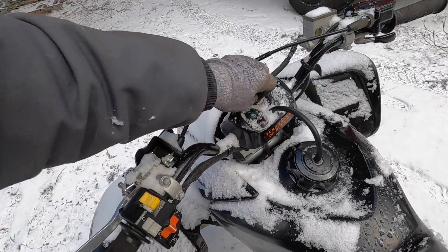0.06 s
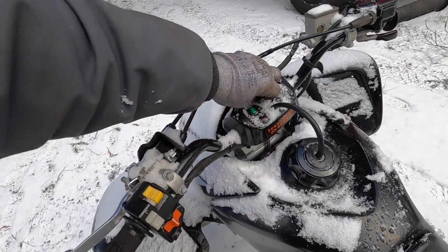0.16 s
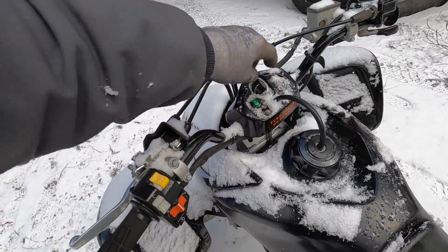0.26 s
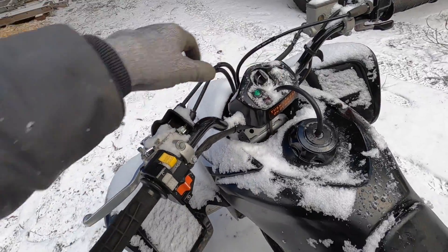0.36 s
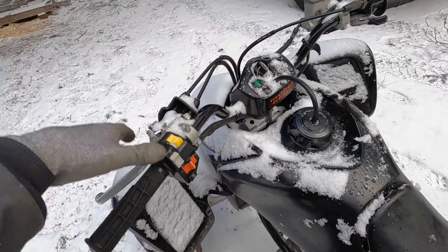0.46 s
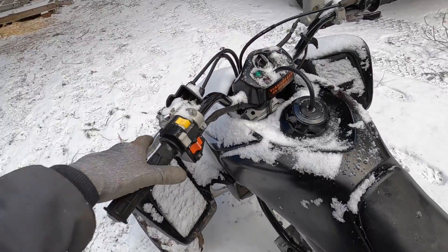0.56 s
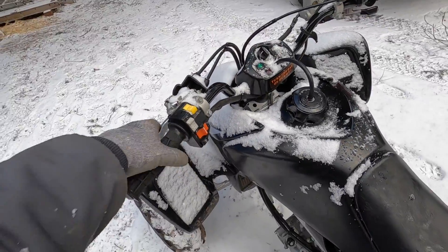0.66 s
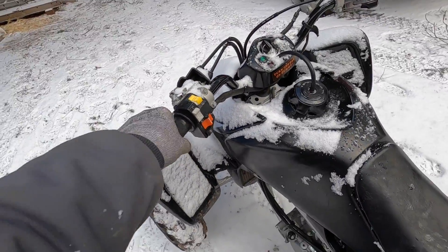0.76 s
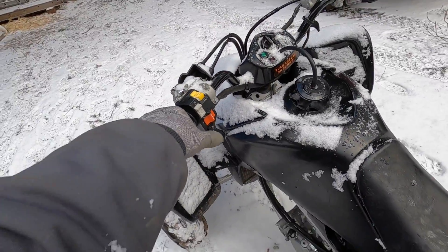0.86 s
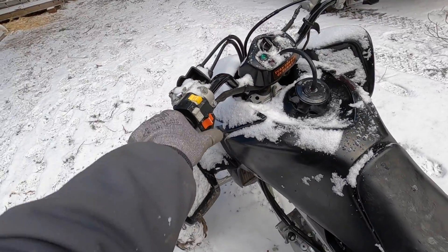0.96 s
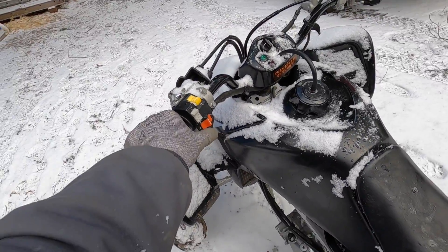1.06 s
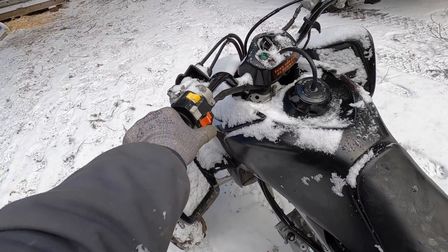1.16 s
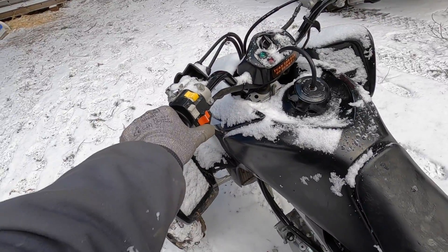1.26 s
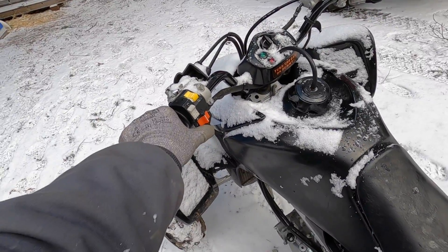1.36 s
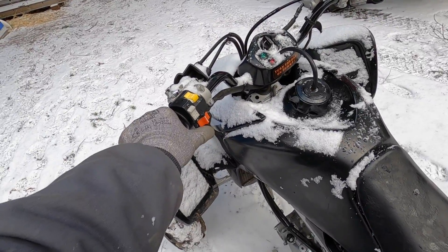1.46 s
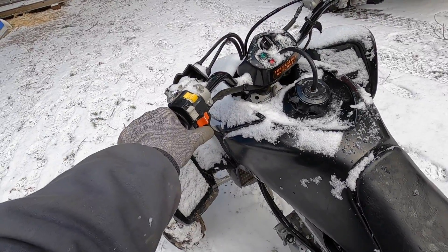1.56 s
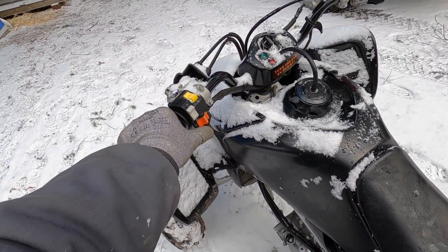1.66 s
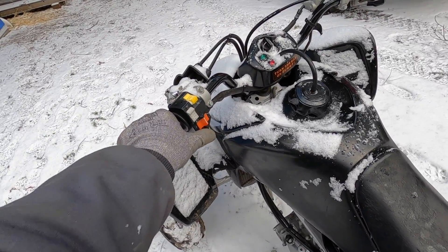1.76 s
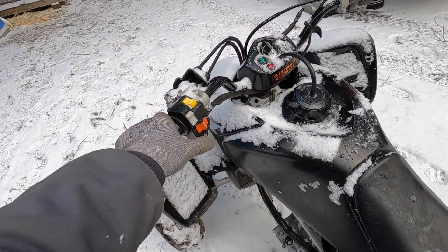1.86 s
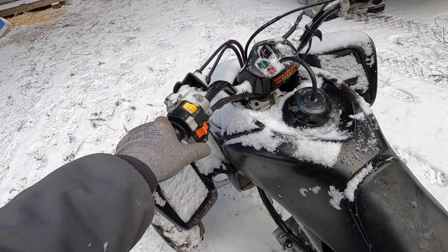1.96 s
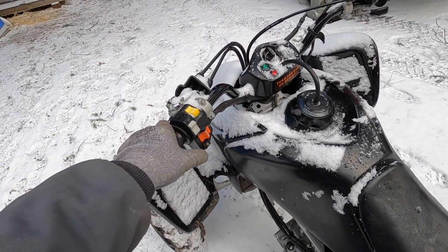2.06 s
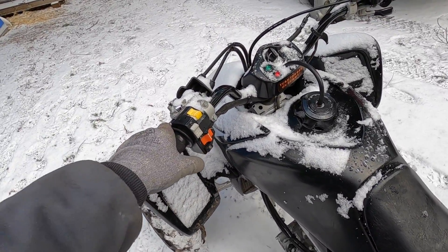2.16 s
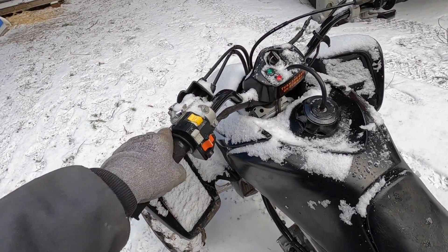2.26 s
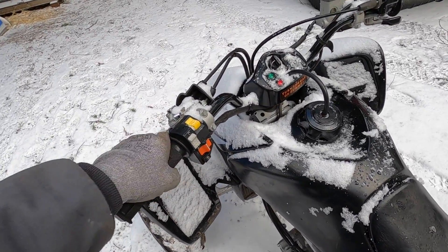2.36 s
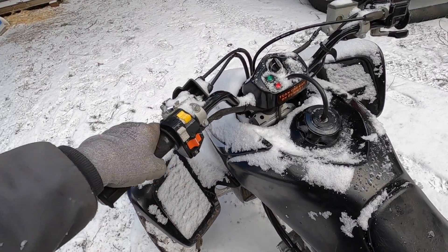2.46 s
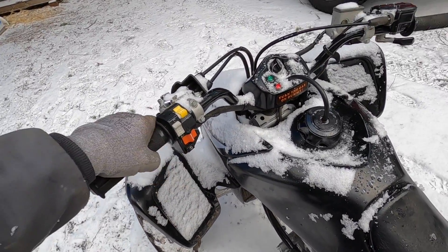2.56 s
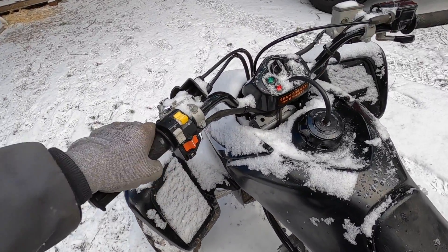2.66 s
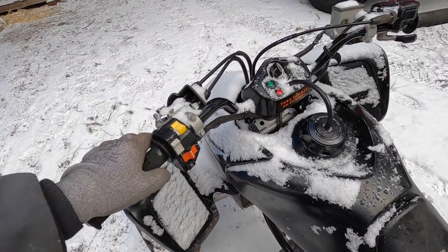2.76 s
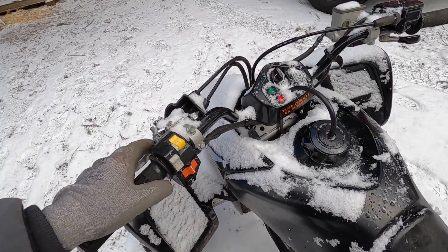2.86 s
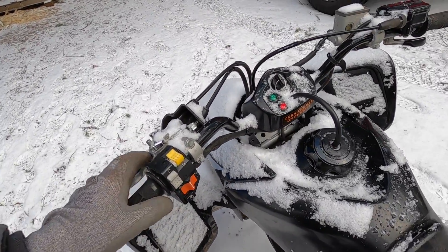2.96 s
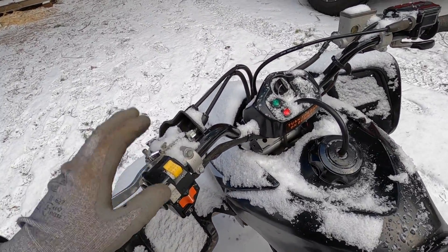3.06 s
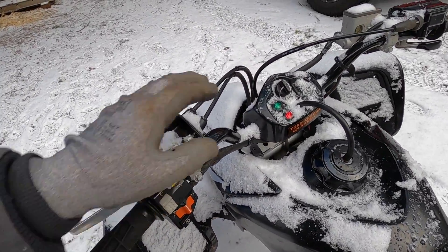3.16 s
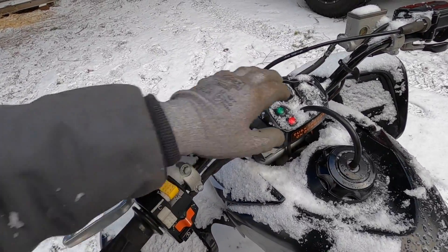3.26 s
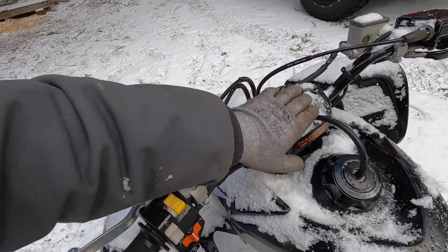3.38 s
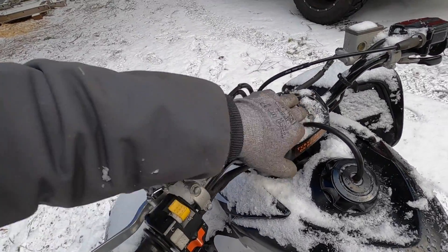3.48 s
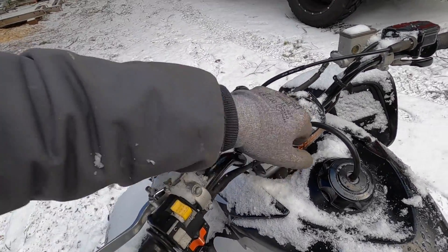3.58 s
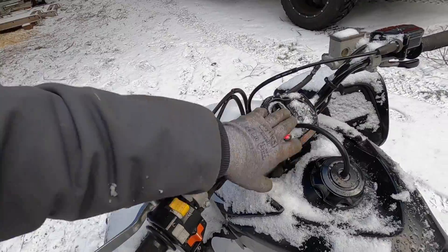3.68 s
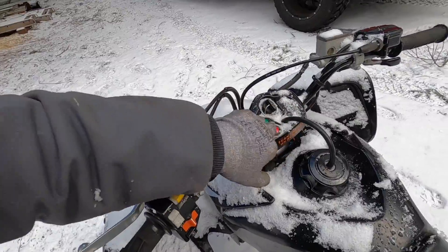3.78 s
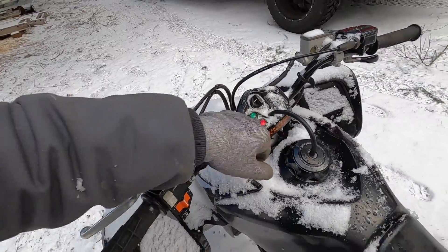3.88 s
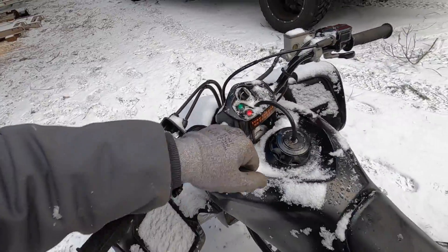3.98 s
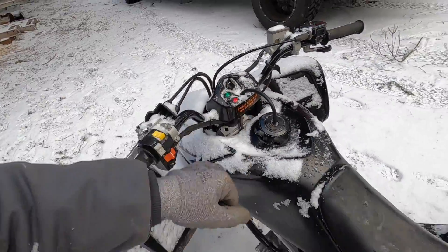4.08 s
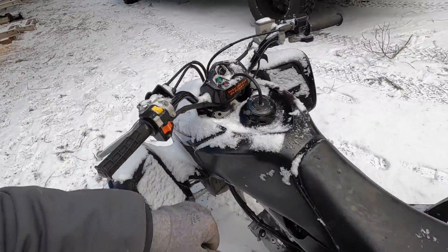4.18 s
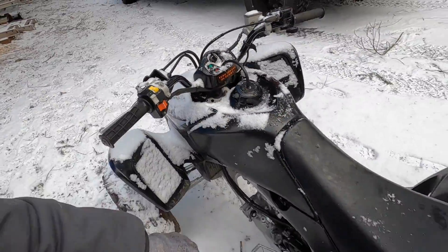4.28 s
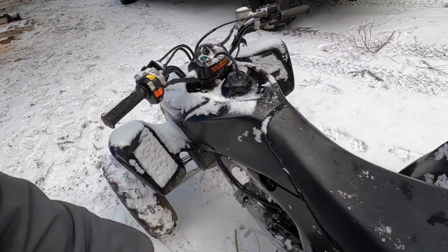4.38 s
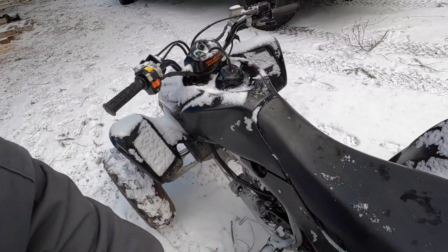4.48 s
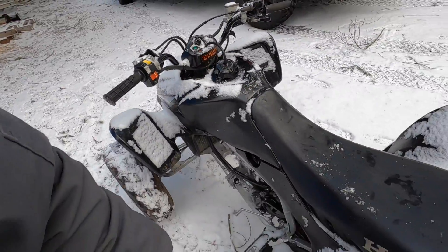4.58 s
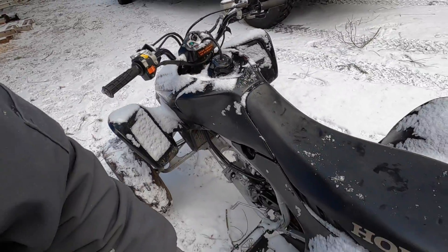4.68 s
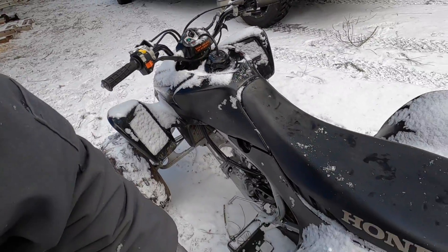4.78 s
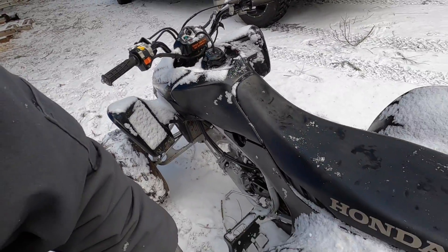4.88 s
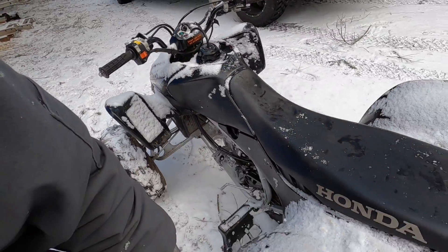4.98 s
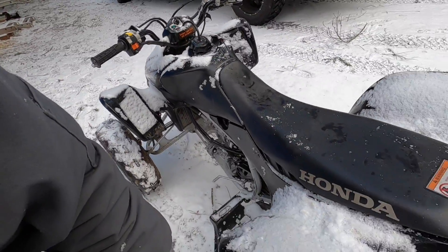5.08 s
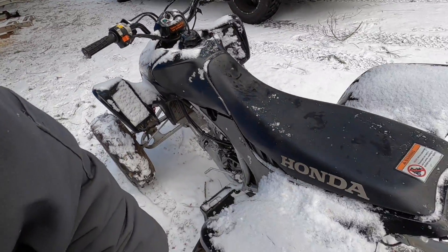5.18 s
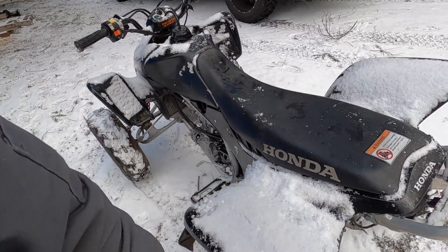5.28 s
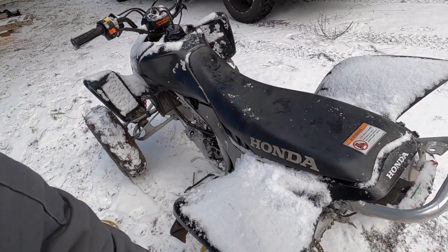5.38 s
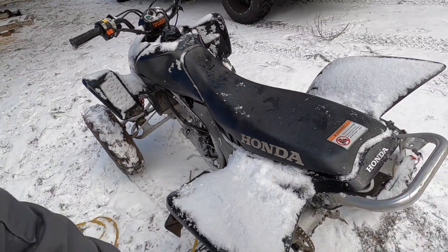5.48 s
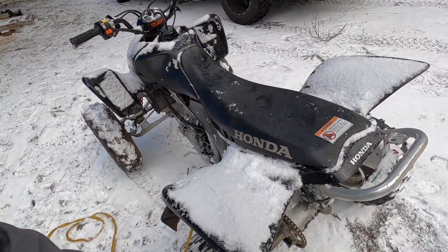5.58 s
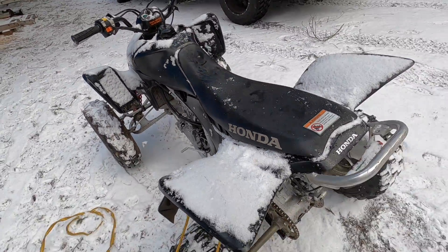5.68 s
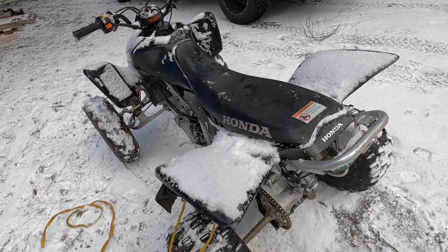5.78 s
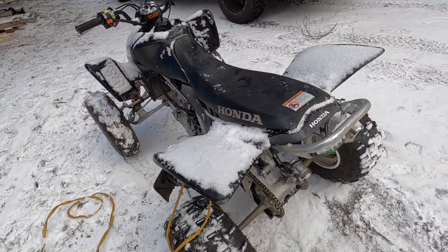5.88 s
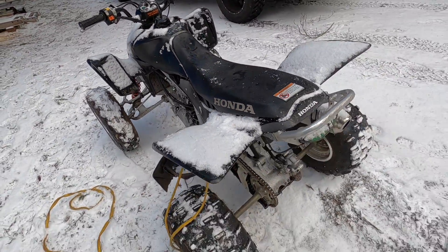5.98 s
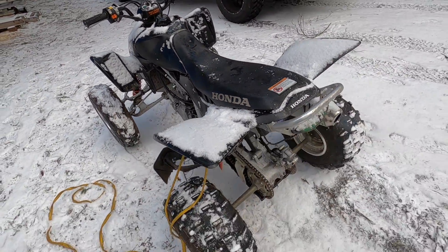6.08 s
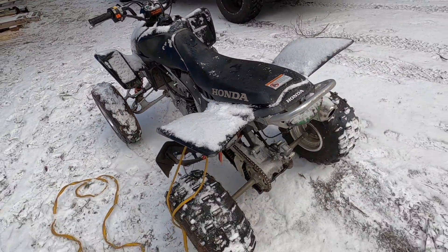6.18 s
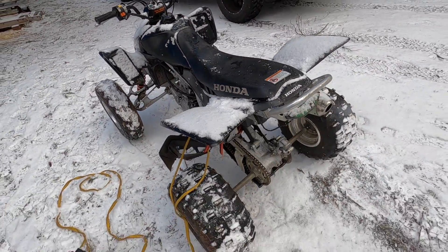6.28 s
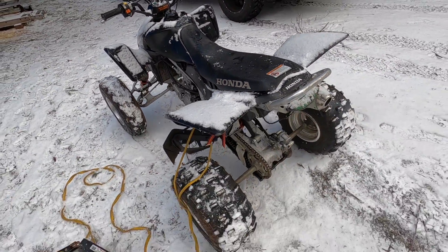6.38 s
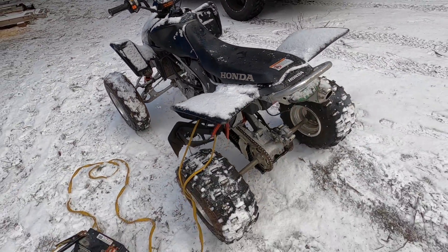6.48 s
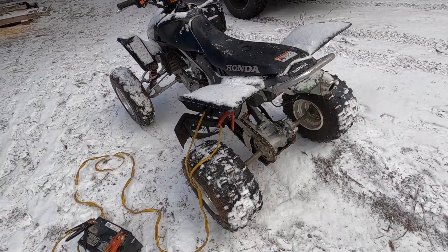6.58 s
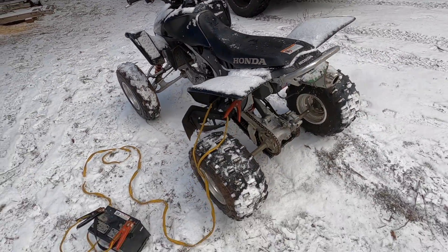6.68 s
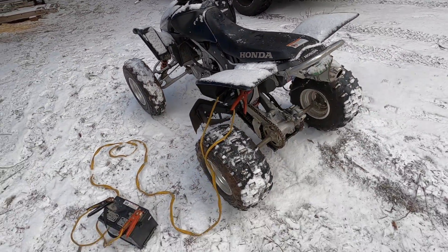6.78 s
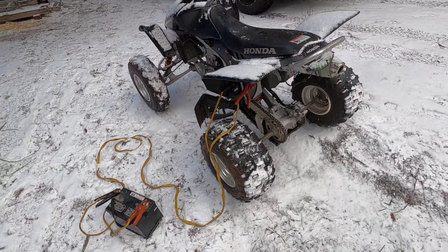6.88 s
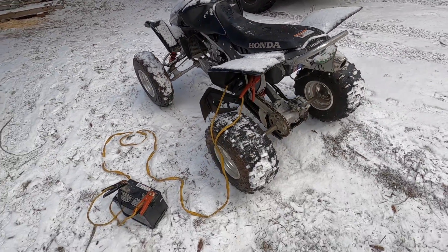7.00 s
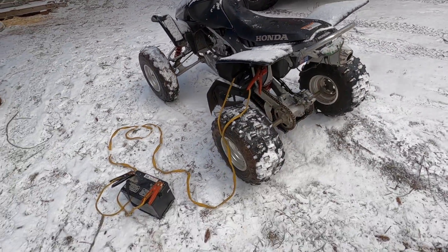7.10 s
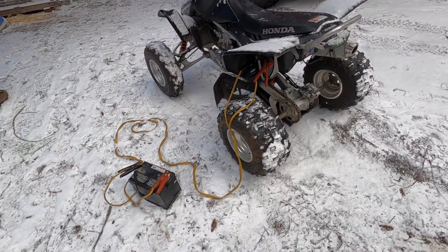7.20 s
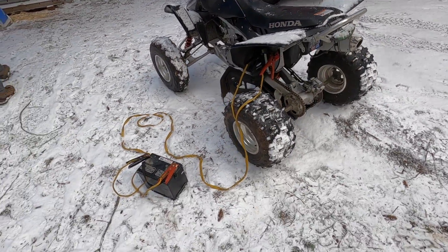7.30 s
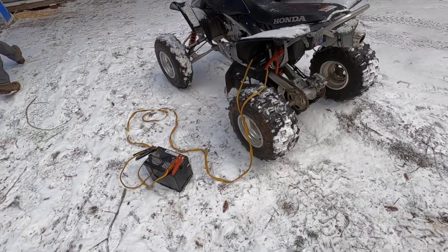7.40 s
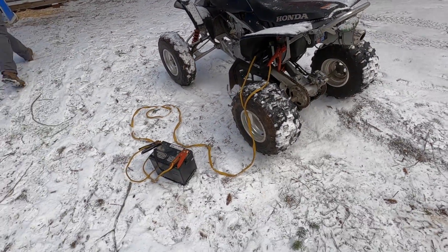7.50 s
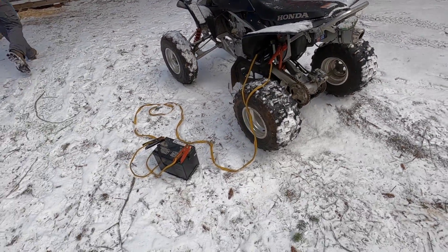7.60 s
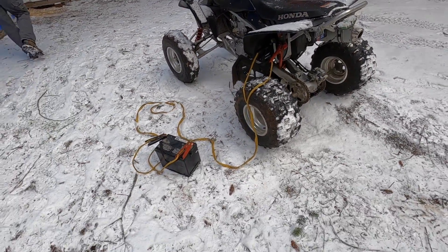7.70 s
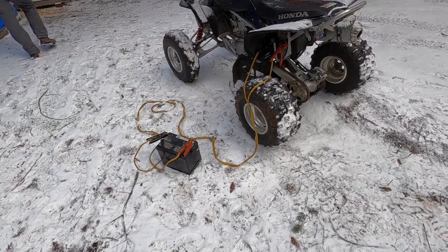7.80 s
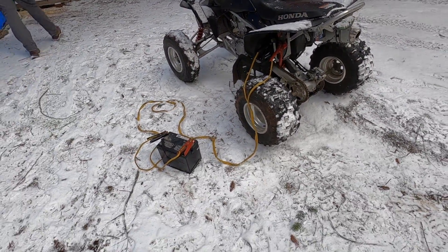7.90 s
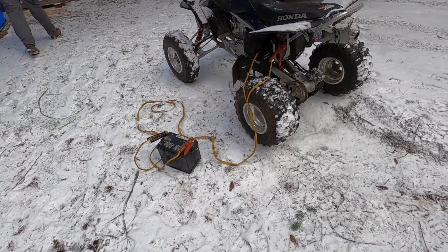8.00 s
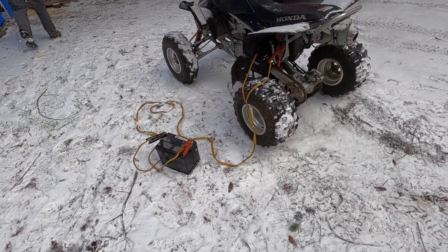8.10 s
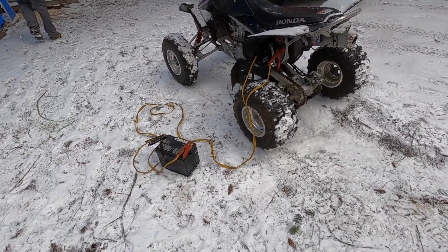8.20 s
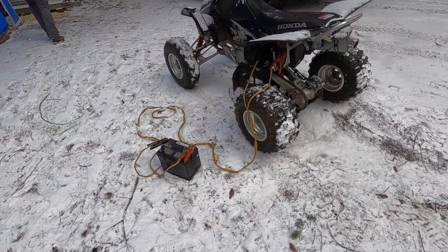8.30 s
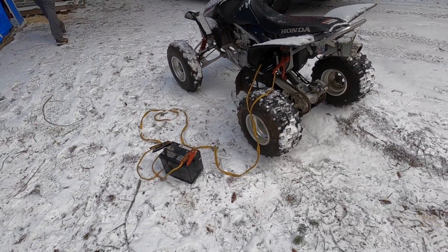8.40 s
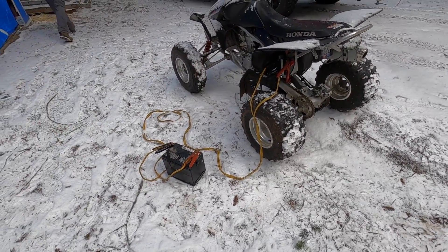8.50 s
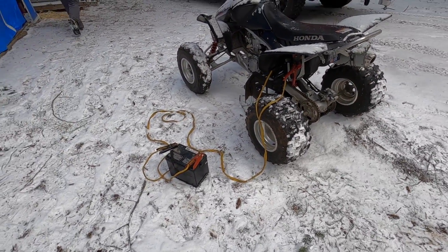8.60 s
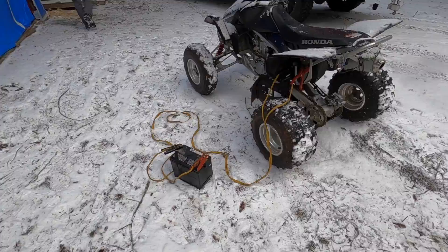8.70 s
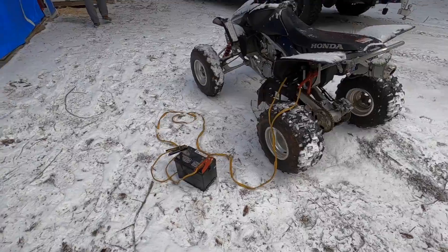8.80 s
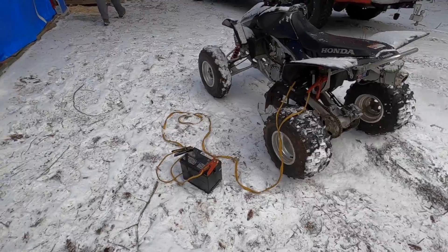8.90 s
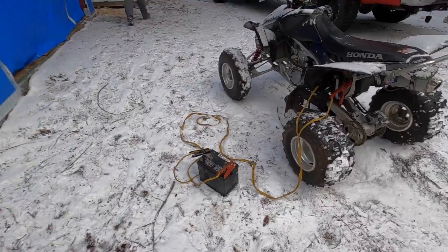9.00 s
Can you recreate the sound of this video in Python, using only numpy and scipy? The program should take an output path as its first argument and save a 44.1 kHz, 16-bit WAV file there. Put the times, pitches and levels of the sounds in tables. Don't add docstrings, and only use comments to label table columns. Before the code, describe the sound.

In a snowy yard with low distant traffic rumble, a gloved hand snaps a key and lever. The starter briefly whirs and grinds its teeth, the one-cylinder quad engine coughs unevenly, catches, speeds up and runs steadily. The close microphone walks with the listener from handlebar past the seat to the tailpipe, so deep muffled thumping turns into sharper, raspier exhaust popping.

```python
import sys
import numpy as np
from scipy import signal
from scipy.fft import rfft, irfft, next_fast_len
from scipy.io import wavfile
from scipy.ndimage import uniform_filter1d

SR = 44100
rng = np.random.default_rng(int(sys.argv[2]) if len(sys.argv) > 2 else 0)


def invert_db(x):
    u = np.asarray(x, float) / 20
    return 10 ** u


def log_audio(samples):
    frames = np.atleast_2d(samples).T
    limited = np.clip(frames, -1, 1)
    pcm = np.round(limited * 32767).astype(np.int16)
    wavfile.write(sys.argv[1], SR, pcm)


N = 399105

# (time [s], silencer level [dB], whole pipe level [dB])
COUGHS = [(1.32, -11.5, -5), (1.344, -13.5, -5), (1.366, -29, -9.5), (1.403, -2, 1), (1.4167, -0.5, 3.5),
          (1.43, -13.5, -7.5), (1.497, -13, -6.5), (1.54, -17.5, -12.5), (1.563, -2.5, -3.5),
          (1.574, -12, 0), (1.644, -9, -7), (1.659, -0.5, 2), (1.673, -4, -3)]
# (time [s], firing rate [1/s])
SPEED = [(1.7262, 15.582), (2.01, 18.854), (2.91, 23.047), (2.99, 22.84), (3.63, 24.299), (4.17, 23.756),
         (4.25, 24.703), (4.89, 25.52), (5.39, 25.037), (5.47, 25.26), (6.25, 26.064), (6.41, 25.791),
         (7.05, 26.379), (7.15, 25.71), (7.35, 26.457), (8.03, 26.339), (8.81, 27.443), (9.06, 27.312)]
CATCH_S = SPEED[0][0]


def in_time(rows, t=None):
    s, *columns = np.transpose(rows)
    if t is None:
        t = np.arange(N) / SR
    return [np.interp(t, s, column) for column in columns]


def coloured(x, spectrum):
    size = next_fast_len(N)
    hz, db = np.transpose(spectrum)
    bins_hz = np.arange(size // 2 + 1) * SR / size
    shape = np.interp(np.log(bins_hz + 1), np.log(hz), db)
    return irfft(rfft(x, size) * invert_db(shape), size)[..., :N]


def noise(spectrum):
    x = coloured(rng.standard_normal(N), spectrum)
    return x / np.std(x)


def butter(x, order, hz, kind="low"):
    return signal.sosfilt(signal.butter(order, hz, kind, fs=SR, output="sos"), x)


def resonance(x, hz, width_hz):
    r = np.exp(-np.pi * width_hz / SR)
    feedback = [1, -2 * r * np.cos(2 * np.pi * hz / SR), r * r]
    return signal.lfilter([(1 - r * r) / 2, 0, (r * r - 1) / 2], feedback, x)


def swell(u, rise, t60):
    u = np.maximum(u, 0)
    return (1 - np.exp(-u / rise)) * invert_db(-60 * u / t60)


def ring(u, hz, rise, t60):
    return np.sin(2 * np.pi * hz * u) * swell(u, rise, t60)


def lay(shapes, starts):
    out = np.zeros(N + shapes.shape[1])
    for shape, start in zip(shapes, starts):
        out[start:start + len(shape)] += shape
    return out[:N]


def echoes(x, lag_s, gain):
    n = np.arange(N)
    return x + sum(gain ** k * np.interp(n - k * lag_s * SR, n, x) for k in range(1, 4))


def tone(rows, partials_db):
    first, last = rows[0], rows[-1]
    fade_in = [(first[0] - .01, first[1], -130)]
    fade_out = [(last[0] + .01, last[1], -130)]
    hz, db = in_time(fade_in + rows + fade_out)
    turn = 2 * np.pi * np.cumsum(hz) / SR
    return invert_db(db) * sum(invert_db(p) * np.sin((k + 1) * turn) for k, p in enumerate(partials_db))


def at_place(values, t):
    # (time [s], place [0 handlebar, 1 seat, 2 rear wheel, 3 tailpipe, 4 a few steps behind])
    walk = [(0, 0), (3.85, 0.), (4.4, 1.), (5.3, 1.5), (6.0, 2.), (6.3, 2.8), (7.1, 3.2), (7.8, 3.8),
            (8.7, 4.), (9.05, 4.)]
    return np.interp(in_time(walk, t)[0], np.arange(len(values)), values)


def coldness(t, fade_s):
    return np.exp(-np.maximum(t - CATCH_S, 0) / fade_s)


def heard(t, parts=slice(None)):
    # (handlebar [dB], seat [dB], rear wheel [dB], tailpipe [dB], behind [dB])
    part_db = [(-7.1, -7.6, -9.6, -8.6, -16.1), (7.1, 6.1, 7.1, 5.1, 6.1), (-45, -22, -9.8, -11.2, -7.6),
               (-34, -13.5, -13, -34, -24), (-31, -20.5, -9.8, -12.2, -7.2), (-19.5, -28, -23, -23, -35),
               (-44, -15.5, -12.5, -10.5, -16.5), (-26, -32, -43, -42, -48), (-42.5, -43, -44.5, -41, -42),
               (-50, -49, -47, -46.5, -47), (-19, -16, 0.1, 1.5, 3), (-44, -16, -13.5, -6.5, -9.5),
               (-25, -23, -20.5, -19, -21), (-54, -54, -58, -58, -56)]
    # (level [dB], fading time [s])
    cold_db = [(0.7, 0.93), (4, 0.2), (19, 0.42), (6.8, 1.1), (-2.5, .8), (3, .9), (15.5, 0.32),
               (-8.5, 0.66), (1, 0.22), (12, 0.18), (8.5, .4), (10, .5), (-3.5, 2.1), (12.5, 1)]
    pairs = zip(part_db[parts], cold_db[parts])
    return np.array([at_place(row, t) + db * coldness(t, fade_s) for row, (db, fade_s) in pairs])


def warming(t):
    # (handlebar [Hz], seat [Hz], rear wheel [Hz], tailpipe [Hz], behind [Hz])
    silencer = (287.4, 279.6, 283.8, 285, 305.8)
    whole_pipe = (112, 115, 133, 115.4, 125)
    round_trip = (147.7, 150, 151.1, 151.4, 155.8)
    cold = coldness(t, 0.8)
    silencer_hz = at_place(silencer, t) * (1 - 0.12 * cold)
    pipe_hz = at_place(whole_pipe, t) * (1 - 0.18 * cold)
    trip_hz = at_place(round_trip, t) * (1 - 0.047 * cold)
    return silencer_hz, pipe_hz, 1 / trip_hz


def distant_traffic():
    # (frequency [Hz], density [dB per Hz])
    rumble = [(12, -38.5), (20, -7.5), (43, -7.5), (69, 0.5), (93, -12.5), (116, -23.5), (189, -24),
              (242, -29.5), (615, -36.5), (687, -33.5), (1090, -36), (3020, -54.5), (7660, -63),
              (14000, -85.5)]
    level_db = -22.5
    running_s = np.maximum(np.arange(N) / SR - CATCH_S, 0)
    duck_db = -0.5 - 0.76 * running_s
    return invert_db(level_db - 13 + duck_db) * noise(rumble)


def clicks():
    # (time [s], peak level [dB], centre [Hz], width [Hz], rattle t60 [s])
    snaps = [(0.22, -38, 3500, 3000, 0.18), (0.23, -29.5, 3000, 2484, 0.072),
             (0.2401, -4.5, 2180, 2200, 0.025), (0.357, -36, 2360, 2390, .03),
             (0.652, -43.5, 2950, 2320, 0.037), (.8, -54, 5000, 3000, 0.07),
             (0.818, -36.5, 7900, 3000, 0.081)]
    u, rows = np.arange(3000) / SR, []
    for s, db, hz, width, t60 in snaps:
        rattle = resonance(rng.standard_normal(len(u)), hz, np.clip(width, 100, 9000))
        rattle = butter(rattle, 2, 9000)
        decay = swell(u, rise=0.00028, t60=t60) + 0.067 * swell(u, rise=.002, t60=0.12)
        rows.append(invert_db(db - 9.5) * rattle / np.std(rattle) * decay)
    return lay(np.array(rows), [round(row[0] * SR) for row in snaps])


def knocks():
    # (time [s], level [dB], frequency [Hz], t60 [s])
    struck = [(.222, -45, 6850, .1), (.242, -44, 4100, .1), (.244, -25, 1620, .027), (.246, -35, 880, .06),
              (.358, -38, 945, .05), (.821, -42, 4750, .05), (.828, -32, 302, .056),
              (1.225, -34, 5300, .031), (1.28, -27, 4650, .06), (1.395, -29, 4650, .044),
              (1.5, -30, 170, .2), (1.57, -38, 4650, .06), (1.845, -41, 5200, .03), (1.885, -42, 5200, .04),
              (1.915, -46, 4650, .05), (2.0, -44, 4450, .03), (2.05, -47, 5200, .04)]
    s, db, hz, t60 = (c[:, None] for c in np.transpose(struck))
    wobble = uniform_filter1d(rng.standard_normal((len(s), 6000)), size=60, axis=1)
    loose = 1 + 2.2 * wobble * (hz > 600)
    modes = invert_db(db) * loose * ring(np.arange(6000) / SR, hz, .0012, t60)
    return lay(modes, np.round(s[:, 0] * SR).astype(int))


def starter_tones():
    # (time [s], frequency [Hz], level [dB])
    spin_up = [(1.09, 150, -80), (1.13, 172, -37), (1.17, 208, -45), (1.22, 225, -57)]
    load_hum = [(1.21, 106.4, -49), (1.25, 112, -45), (1.4, 107.1, -28.5), (1.47, 116.8, -38.5),
                (1.53, 104.8, -30), (1.62, 115, -36), (1.7, 113.6, -49)]
    mesh = [(1.26, 1248, -40.5), (1.31, 1142, -22.5), (1.35, 971, -22), (1.39, 894, -34.5)]
    whistle = [(1.595, 5650, -62), (1.64, 5950, -64), (1.69, 6250, -58), (1.76, 6400, -58),
               (1.84, 6380, -59), (1.865, 6100, -68)]
    hum = tone(spin_up, [-3, 0.0, -20.5, -21]) + tone(load_hum, [6.5, -3.5, -1, -8.5])
    return hum + tone(mesh, [-6, -3.5, -7, -15.5]) + tone(whistle, [0])


def tooth_bites():
    # (time [s], length [s], level [dB])
    bites = [
        (1.22, 0.15, -19.5),
        (1.484, 0.013, -15.5),
        (1.534, 0.0041, -15.5),
    ]
    set_in_s, swell_db, slip_s = 0.0078, 9.5, 0.038
    t = np.arange(N) / SR
    drag_db = -33.5 - 60 * np.maximum(t - 1.57, 0) / 0.11
    out = invert_db(drag_db) * (t > bites[0][0])
    for s, length, db in bites:
        held_db = db - swell_db * np.clip(1 - (t - s) / .08, 0, 1) * (length > .08)
        slip_db = -60 * np.maximum(t - s - set_in_s - length, 0) / slip_s
        out += np.clip((t - s) / set_in_s, 0, 1) ** 2 * invert_db(held_db + slip_db)
    return out


def starter_grind():
    # (frequency [Hz], density [dB per Hz])
    scrape_colour = [(290, -35), (500, -21.5), (788, -18), (990, -14.5), (1410, -21.5), (2230, -9),
                     (2430, -13.5), (4800, -20.5), (10500, -41.5), (15000, -57)]
    # (frequency [Hz], width [Hz], level [dB])
    modes = [(1210, 110, 8.5), (1630, 73, 7.5), (2035, 59, -1.5), (2740, 31, -1), (3120, 69, -6),
             (3500, 160, 4), (4650, 42, -4), (6200, 42, -19.5), (7200, 32, -19.5), (7750, 82, -17.5)]
    scrape = noise(scrape_colour)
    teeth = rng.standard_normal(N) * invert_db(3.2 * rng.exponential(1, N))
    housing = np.zeros(N)
    for k, (hz, width, db) in enumerate(modes):
        housing += invert_db(db) * (-1) ** k * resonance(teeth, hz, width) / np.sqrt(width)
    return tooth_bites() * (0.44 * scrape + 0.5 * housing / np.std(housing))


def firings():
    s = np.arange(N) / SR
    count = np.cumsum(in_time(SPEED)[0] * (s > CATCH_S)) / SR
    steady = s[1:][np.diff(np.floor(count)) > 0]
    at = np.append(np.array(COUGHS)[:, 0], np.append(CATCH_S, steady))
    at = at[at < N / SR]
    at = at - .0004 + 0.00018 * rng.standard_normal(400)[:len(at)]
    starts = ((at - .015) * SR).astype(int)
    u = (starts[:, None] + np.arange(4000)) / SR - at[:, None]
    return at, starts, u


def silencer_bark(u, silencer_hz):
    shut = np.maximum(u - 3 / silencer_hz, 0)
    bark = -ring(u, silencer_hz, rise=.0016, t60=9) * invert_db(-60 * shut / .013)
    bark += invert_db(-11) * ring(u - .0021, 1.4 * silencer_hz, rise=0.0032, t60=0.069)
    return bark + .3 * ring(u - .0051, 1.18 * silencer_hz, rise=.01, t60=.08)


def silencer_overtones(at, u, silencer_hz):
    octave = 2.01 - .17 * coldness(at, .9)[:, None]
    upper = ring(u + .0005, octave * silencer_hz, rise=.004, t60=.06)
    for ratio, db in ((2.98, -11), (3.5, -18), (3.97, -17)):
        upper += invert_db(db) * ring(u, ratio * silencer_hz, rise=.002, t60=.04)
    return upper


def tailpipe_fronts(u, trip):
    wave = sum(gain * ring(u - lag, 389, rise=.0002, t60=.013) for lag, gain in ((0, 1), (trip, 1.3)))
    passes = ((0, 1), (trip, .7), (2 * trip, .22))
    sharp = sum(gain * ring(u + 0.00043 - lag, 890, rise=0.00025, t60=0.0052) for lag, gain in passes)
    return wave, sharp


def carburettor_chirp(u):
    chirp = ring(u + .0095, 1230, rise=0.0035, t60=0.039)
    return chirp + 0.38 * ring(u + 0.0056, 2040, rise=0.00047, t60=0.022)


def exhaust(at, starts, u):
    count = len(at)
    silencer_hz, pipe_hz, trip = (c[:, None] for c in warming(at))
    heard_db = heard(at)
    cough_db = np.pad(np.array(COUGHS)[:, 1:], ((0, count - len(COUGHS)), (0, 0)))
    cough_silencer_db, cough_pipe_db = cough_db[:, [0]], cough_db[:, [1]]
    uneven_db = 0.36 * rng.standard_normal((400, 8))[:count]
    levels = invert_db(heard_db[:8].T + cough_db[:, [0, 1, 0, 0, 0, 0, 0, 0]] + uneven_db)
    silencer, pipe, front, chamber, fundamental, overtones, crack, chirp = (c[:, None] for c in levels.T)
    standing_db, outflow_db = heard_db[11:13, :, None]

    gas = silencer * silencer_bark(u, silencer_hz)
    gas += overtones * silencer_overtones(at, u, silencer_hz)
    gas += pipe * ring(u + .197 / pipe_hz, pipe_hz, rise=.026, t60=.053)
    gas += invert_db(cough_pipe_db) * .61 * ring(u - .0023, 82, rise=.03, t60=.117)
    gas += invert_db(cough_pipe_db + outflow_db) * ring(u - .0031, 55.3, rise=0.024, t60=0.34)

    late = .00008 * rng.standard_normal((400, 1))[:count]
    front, crack = (c * invert_db(2.1 * rng.standard_normal((400, 1))[:count]) for c in (front, crack))
    wave, sharp = tailpipe_fronts(u - late, trip)
    gas -= front * wave + crack * sharp
    gas += fundamental * ring(u - .0012, 151, rise=.0145, t60=.13)
    gas -= chamber * ring(u - .0005, 444, rise=.002, t60=.079)

    for k, db in zip(range(4, 10), (-14, -15.5, -23.5, -24, -23, -33)):
        level = invert_db(db + standing_db + cough_silencer_db + uneven_db[:, [k - 4]])
        gas -= level * ring(u + 0.00062 - late, k / trip, rise=0.00096, t60=0.031)

    dull = butter(lay(gas, starts), 4, 1500)
    return dull + lay(chirp * carburettor_chirp(u), starts)


def once_running(x, level_db):
    running = np.clip((np.arange(N) / SR - 1.58) / 0.036, 0, 1)
    return running * invert_db(level_db) * x / np.std(x[3 * SR:])


def gas_rasp(starts, u):
    # (frequency [Hz], density [dB per Hz])
    rasp_colour = [(300, -24), (450, -5), (620, -7), (850, -5), (1100, -3.5), (1400, -10.5), (2000, -13.5),
                   (2600, -56.5)]
    suction_share = (1.2, .6, .4, .3, .3)
    t = np.arange(N) / SR
    puff = lay(swell(u + 0.00017, rise=0.0029, t60=0.017), starts)
    puff += at_place(suction_share, t) * lay(swell(u + 0.011, rise=0.009, t60=0.044), starts)
    rasp = noise(rasp_colour) * (.12 + puff)
    silencer_hz, _, trip = warming(t)
    behind = at_place((.37, .65), t)
    rasp = (1 - behind) * echoes(rasp, 1 / silencer_hz, .75) + behind * echoes(rasp, trip, .75)
    return once_running(rasp, heard(t, slice(8, 9))[0])


def clatter(gear):
    # (middle [s], half length [s], frequency [Hz], level [dB])
    covers = [(2.0, .15, 5200, 3), (2.9, .25, 2550, 2.5), (2.95, .35, 3700, 4), (3.55, .35, 3200, 4),
              (4.15, .1, 3600, 3), (4.8, .25, 3250, 6), (4.85, .25, 4200, 5), (4.85, .3, 2400, 3),
              (8.3, .3, 4000, 2.5), (8.7, .2, 2700, 5)]
    t = np.arange(N) / SR
    out = np.zeros(N)
    for s, half, hz, db in covers:
        out += invert_db(db) * np.exp(-((t - s) / half) ** 2) * resonance(gear, hz, 380)
    return out


def valve_gear(starts, u):
    # (frequency [Hz], density [dB per Hz])
    gear_colour = [(760, -30), (1300, -5.5), (1410, -6), (1820, -6.5), (2040, -6.5), (2260, -8), (2690, -9),
                   (4050, -15.5), (5620, -24.5), (7630, -28), (9180, -41), (15000, -48)]
    gear_db, air_db = heard(np.arange(N) / SR, slice(9, 11))
    breath = invert_db(1.3 * rng.standard_normal((400, 1)))[:len(u)] * swell(u + 0.0065, rise=0.0021, t60=0.12)
    breath += 0.54 * swell(u - .021, rise=0.0006, t60=0.022)
    tick_amp = invert_db(0.85 * np.minimum(rng.exponential(1, N), 4))
    ticks = (rng.random(N) < 900 / SR) * tick_amp * rng.choice([-1, 1], N)
    ticks = coloured(ticks, gear_colour)
    gear = 0.65 * noise(gear_colour) + .5 * ticks / np.std(ticks)
    gear *= .5 + 1.1 * lay(breath, starts)
    gear += clatter(gear)
    gear += invert_db(air_db) * butter(gear, 2, 5000, "high")
    return once_running(gear, gear_db)


def tappet(at, starts, u):
    chance = rng.standard_normal((400, 2))[:len(at)]
    db = heard(at)[13][:, None] + 4.5 * chance[:, :1]
    hz = 2900 * (1 + 0.044 * chance[:, 1:])
    ticks = invert_db(db) * ring(u + 0.0055, hz, rise=0.0018, t60=0.065)
    return lay(ticks[len(COUGHS):], starts[len(COUGHS):])


def two_ears(mid):
    # (frequency [Hz], level against mid [dB])
    side_db = [(60, -53), (250, -63.5), (600, -28), (1500, -40.5), (4000, -35), (9000, -9.5), (15000, -18)]
    body_shade = [(200, -52.5), (450, -20.5), (1100, -24.5), (2000, -48.5)]
    n = np.arange(N)
    tail = rng.standard_normal(4000) * invert_db(-60 * np.arange(4000) / 3500)
    scattered = signal.fftconvolve(mid, tail)[:N]
    side = coloured(scattered * np.std(mid) / np.std(scattered), side_db) - coloured(mid, body_shade)
    lag = at_place((0, 1.05, 2.1), n / SR)
    pan_db = at_place((0, 0, 0, -.25, -.5), n / SR)
    left = np.interp(n - lag, n, mid + side)
    return np.array([left * invert_db(pan_db / 2), (mid - side) * invert_db(-pan_db / 2)])


def scene():
    at, starts, u = firings()
    mid = distant_traffic() + clicks() + knocks() + starter_tones() + starter_grind()
    mid += exhaust(at, starts, u) + gas_rasp(starts, u) + valve_gear(starts, u) + tappet(at, starts, u)
    return two_ears(mid)


def top_cut(x):
    return signal.sosfilt(signal.butter(12, 15600, fs=SR, output="sos"), x)


def record(dry):
    # (frequency [Hz], density [dB per Hz])
    hiss_colour = [(2000, -8.5), (8000, -3), (11000, 2), (14000, -4), (16000, -27)]
    hiss_db = -83
    hiss = invert_db(hiss_db) * np.array([noise(hiss_colour), noise(hiss_colour)])
    dry = butter(dry, 1, 18, "high")
    mix = 1.457 * np.tanh((dry + hiss) / 1.127)
    return top_cut(mix)


dry = scene()
out = record(dry)
log_audio(out)
```